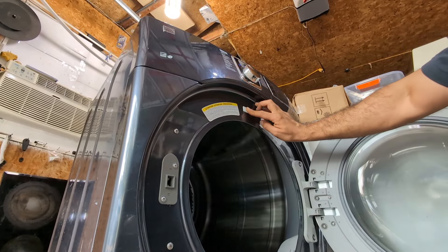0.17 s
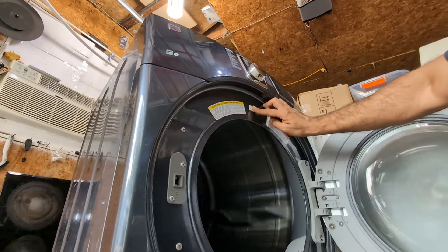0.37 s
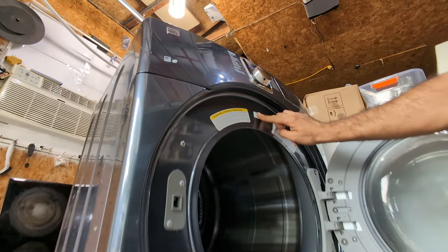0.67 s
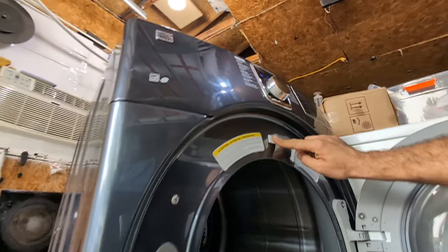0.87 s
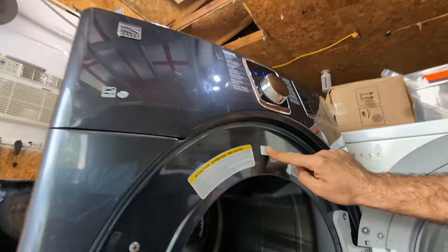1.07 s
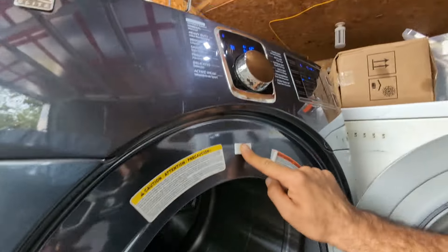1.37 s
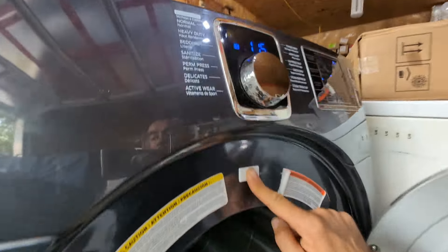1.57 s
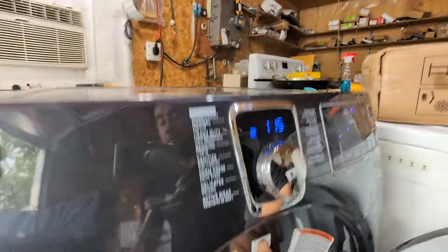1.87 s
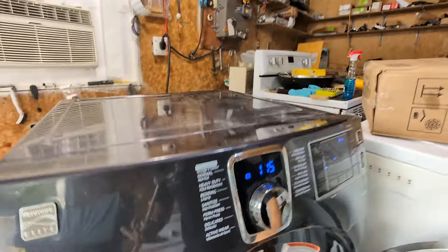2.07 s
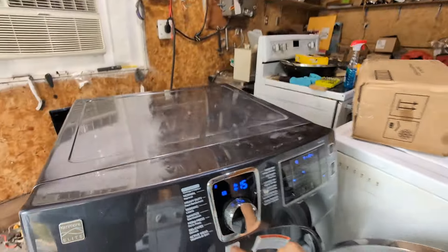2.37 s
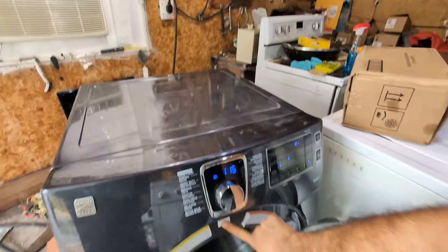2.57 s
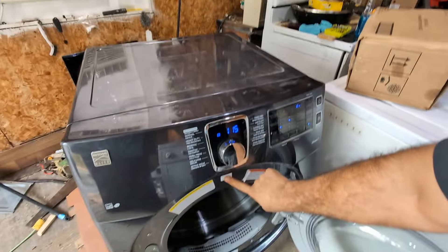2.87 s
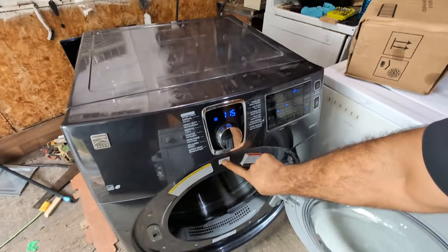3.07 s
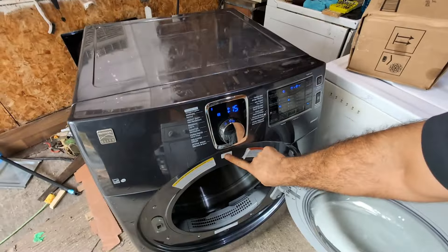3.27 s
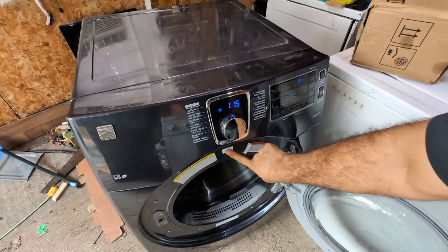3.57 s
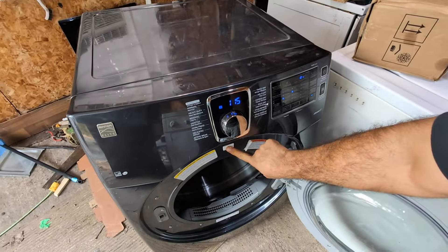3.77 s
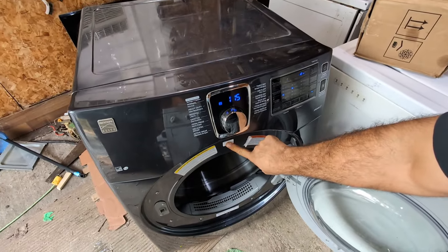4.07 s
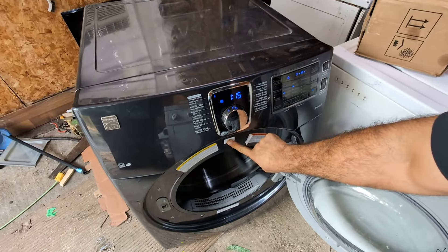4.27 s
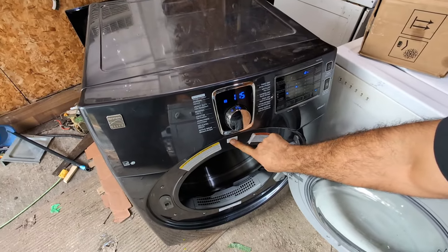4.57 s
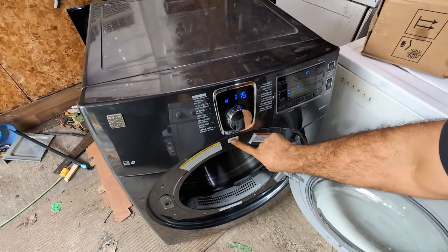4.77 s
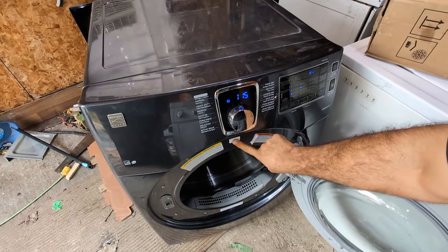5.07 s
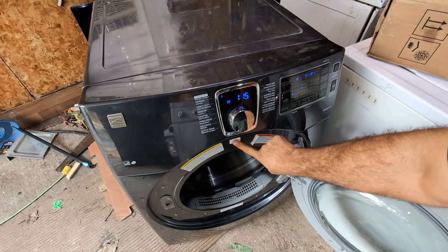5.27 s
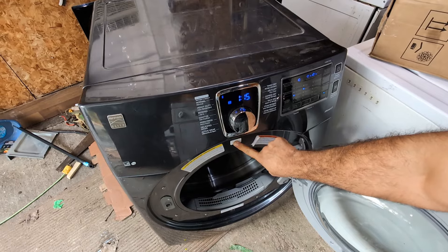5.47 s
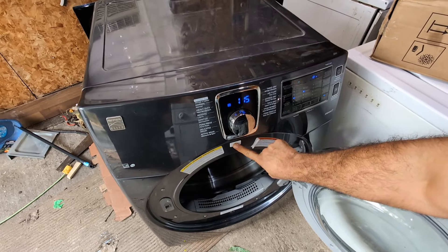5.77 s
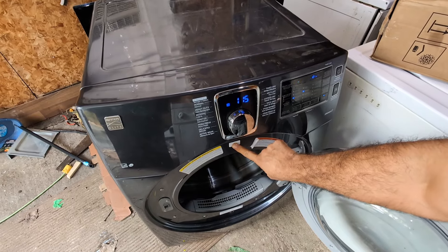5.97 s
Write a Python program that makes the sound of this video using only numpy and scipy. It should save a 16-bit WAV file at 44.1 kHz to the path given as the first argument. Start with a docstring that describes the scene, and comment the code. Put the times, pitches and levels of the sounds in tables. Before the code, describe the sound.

An empty clothes dryer is already running with its door open, heard close at the drum's mouth. From 0 to about 1.5 seconds a strong, smooth low hum near 120 hertz dominates, with hollow rumble, soft dull thumps about six per second, and a broad airy hiss whose brightness shifts in a cycle of roughly one and a quarter seconds. Faint scuffs come near 0.9 and 1.5. As the microphone rises past the rim, air rush peaks around 1.7 and a mid-pitched blower tone swells near 1.9, while the hum and boom fall away. A clearer soft, low scuff passes at 2.4, weaker ones near 2.7. From about 2.6 to 6 seconds the sound holds steady above the cabinet: much quieter hum, subdued thumping, thin steel resonance, faint blower whine and continuous cycling hiss. The machine never stops.

```python
"""An empty clothes dryer runs in a garage, its door open and a finger holding the door switch.
At first the microphone is at the drum's mouth: motor hum at twice the mains frequency, hollow rumble, blower tone.
Then it is lifted past the door's rim, with soft scuffs of noise, a rush of air and a surge of the blower tone.
Last it stays above the cabinet: the boom has faded and shaken sheet steel takes over.
Throughout, the drum thumps on a worn wheel and its felt seals hiss in a pattern that repeats every turn."""
import sys
import numpy as np
from scipy.fft import rfft, irfft, next_fast_len
from scipy.io import wavfile
from scipy.ndimage import uniform_filter1d, map_coordinates

SR = 44100
rng = np.random.default_rng(int(sys.argv[2]) if len(sys.argv) > 2 else 0)


def dump_mix(stems):
    """Bounce the given channels to the path in sys.argv[1] as a 16-bit WAV at rate SR."""
    frames = np.atleast_2d(stems).T  # one column per channel
    limited = np.clip(frames, -1, 1)  # hard clip at full scale
    pcm = np.round(limited * 32767).astype(np.int16)
    wavfile.write(sys.argv[1], SR, pcm)


N = 270333  # samples

# motor hum along the microphone's path, before trim: [time_s, fundamental_db]
HUM_PATH = [(0.1, -16.5), (0.67, -17.5), (1.59, -21), (2.56, -30), (5.77, -31), (6.0, -30.5)]


def motor():
    """Magnetic pull shakes the motor twice per mains cycle; the third harmonic grows as the others fade."""
    hum_hz = 120.0
    [hum_db] = curves(HUM_PATH)
    away_db = off_mouth_db()
    first = amp(hum_db - 0.2) * tone(hum_hz, waver_db=0.57, drift_rad=0.01)
    second = amp(hum_db - 27) * tone(2 * hum_hz, waver_db=3.0, drift_rad=0.22)
    third_db = -42.0 - 5.5 * np.exp(-away_db / 0.99)
    third = amp(third_db) * tone(3 * hum_hz, waver_db=0.66, drift_rad=0.12)
    fourth = amp(-47 - 0.9 * away_db) * tone(4 * hum_hz, waver_db=1.6, drift_rad=0.06)
    return panned(first + second, -1.26) + panned(third, -1.7) + panned(fourth, 0.99)


# blower tone along the microphone's path, before trim: [time_s, level_db, left_minus_right_db]
BLADE_PATH = [(0.05, -49.5, -6.5), (0.63, -50, -4.5), (0.75, -57, -5.0), (0.8, -48, 5), (1.39, -54, 6),
              (1.92, -40.5, 1.0), (2.4, -51.5, 9), (2.56, -55.5, -9.0), (3.04, -50, -4), (5.87, -49, -5.5),
              (6.05, -48, -8)]
# colour of the air pulled through the drum: [frequency_hz, relative_density_db]
DRAUGHT_COLOUR = [(20, -10), (50, 0), (200, 2), (520, 2), (670, 3), (830, 6.5), (1020, 3), (1170, 3.5),
                  (1450, -2.5), (2200, -36), (5000, -54)]


def blower():
    """The wheel's blades sing with a weak octave, over the draught they pull through the drum."""
    blade_hz = 577.1
    blade_db, lean_db = curves(BLADE_PATH)
    blade_tone = amp(blade_db + 1.4) * tone(blade_hz, waver_db=0.1, drift_rad=0.18)
    octave = amp(-67.0) * tone(2 * blade_hz, waver_db=3.5, drift_rad=0.46)
    draught_db = -51.0 + 1.26 * at_door_db() + 0.99 * wobble(28)
    draught = amp(draught_db) * rush(DRAUGHT_COLOUR)
    return panned(blade_tone, lean_db) + octave + draught


# the drum's hollow ring along the microphone's path, before trim: [time_s, level_db]
MOUTH_PATH = [(0, -37.5), (.4, -42), (1.1, -36), (1.65, -37.5), (2.2, -49.5), (6.13, -47)]
# air modes inside the drum: [centre_hz, nominal_width_hz, relative_level_db]
CAVITY_MODES = [(248.7, 20, 0.5), (282, 43, -8), (375, 49, -10.5)]
# higher air modes of the open drum: [centre_hz, nominal_width_hz, relative_level_db]
HOLLOW_MODES = [(894, 31, 3), (1280, 170, -7.5), (1763, 140, -2.5), (2060, 150, -2), (2330, 230, -10.5)]
# upper resonances of the sheet steel: [centre_hz, nominal_width_hz, relative_level_db]
PANEL_MODES = [(606, 25, 3), (628, 11.6, -6.5)]
# lower resonances of the cabinet's steel: [centre_hz, nominal_width_hz, relative_level_db]
CABINET_MODES = [(146, 26, 4), (171, 25.6, 2.5), (206, 55, 0.5), (231.2, 23.4, -0.5), (269, 35, -5),
                 (334.5, 53, -3), (390.5, 27, 1.5), (451, 38, -2.5), (508, 27, -9.5), (562, 57, -12)]


def drum():
    """The rolling drum shakes the air inside it and the steel around it; from above, the steel takes over."""
    away_db = off_mouth_db()
    [mouth_db] = curves(MOUTH_PATH)
    boom = amp(-23.0 + 0.19 * mouth_db - 0.37 * away_db) * rolling()
    # the air modes escape through the open door
    cavity = amp(mouth_db - 0.9) * steadied(shaken(CAVITY_MODES), seconds=0.12)
    hollow = amp(mouth_db - 19.0) * shaken(HOLLOW_MODES)
    panel = amp(-54 + 0.36 * away_db) * steadied(shaken(PANEL_MODES), seconds=0.27)
    cabinet_db = -42.0 + 0.22 * away_db + 1.3 * wobble(20)
    cabinet = amp(cabinet_db) * shaken(CABINET_MODES)
    return boom + cavity + hollow + panned(panel, -1.6) + cabinet


# low resonances of the drum and cabinet: [centre_hz, nominal_width_hz, relative_level_db]
BOOM_MODES = [(57.2, 4.2, -17.5), (82.9, 17, -8), (94.5, 9.3, -9.5)]


def rolling():
    """The drum rumbles on a worn support wheel, whose flat spot thumps softly once per wheel turn."""
    wheel_hz, first_thump_s = 6.34, 0.01814
    thump_hz, thump_half_s, thump_db = 82, 0.026, -3.5
    lump_db, uneven_db = 2, 0.9
    turns = (np.arange(N) / SR - first_thump_s) * wheel_hz
    from_thump_s = (turns - np.round(turns)) / wheel_hz
    swell = np.exp(-(from_thump_s / thump_half_s) ** 2)
    thumps = unit(swell * np.sin(2 * np.pi * thump_hz * from_thump_s))
    # the rumble swells twice per wheel turn
    lumps = amp(lump_db * np.cos(2 * np.pi * 2 * turns))
    rumble = lumps * steadied(shaken(BOOM_MODES), seconds=0.19)
    return amp(uneven_db * wobble(9)) * (rumble + amp(thump_db) * thumps)


# the seals' hiss over one turn of the drum: [time_into_turn_s, hiss_change_db, fine_hiss_change_db]
SEAL_TURN = [(0, 1.5, 0), (.12, .1, -0.2), (.36, 1, 1), (.55, -2.4, -.6), (.73, -0.5, -1), (.9, -0.5, -2.5),
             (1.03, 1.5, 0), (1.13, 0.5, 2.5)]
# colour of the felt's rubbing: [frequency_hz, relative_density_db]
FELT_COLOUR = [(700, -18), (1300, -1.5), (1800, 0), (2600, 0), (3400, -.5), (4500, -4), (6000, -5.5),
               (9000, -22), (15000, -40)]
# colour of the seals' hiss: [frequency_hz, relative_density_db]
HISS_COLOUR = [(3000, -17), (5000, -9.5), (7000, -1.5), (9500, -0.5), (11500, -4.5), (15500, -17)]
# colour of the finest hiss: [frequency_hz, relative_density_db]
FINE_HISS_COLOUR = [(7000, -46), (10000, -11), (11300, -1), (13000, -3), (15000, -4), (16000, -7.5)]


def seals():
    """The drum's rims slide on felt; the hiss swells and changes colour alike on every turn."""
    turn_s = 1.245
    door_db, away_db = at_door_db(), off_mouth_db()
    time_s, *columns = np.transpose(SEAL_TURN)
    hiss_db, fine_db = (np.interp(np.arange(N) / SR, time_s, c, period=turn_s) for c in columns)
    rub_db = -50.8 + 0.96 * door_db + 0.4 * wobble(40)
    rub = amp(rub_db) * rush(FELT_COLOUR)
    hiss_db = -56.0 + 1.2 * door_db + hiss_db + 0.3 * wobble(14)
    hiss = amp(hiss_db) * rush(HISS_COLOUR)
    # the finest hiss beams straight out of the drum's mouth
    fine_db = -52.7 + 0.7 * door_db - 0.19 * away_db + fine_db + 0.4 * wobble(12)
    fine = amp(fine_db) * rush(FINE_HISS_COLOUR)
    return rub + hiss + fine


# soft scuffs: [time_s, level_db, centre_hz, nominal_width_hz, half_length_s]
SCUFF_EVENTS = [(0.878, -50, 1300, 500, 0.046), (1.513, -48.5, 920, 120, .04),
                (2.396, -40.5, 468, 80, 0.037), (2.417, -50.5, 1090, 400, 0.053),
                (2.696, -52, 834, 300, 0.21), (2.73, -52, 1400, 800, 0.026)]


def scuffs():
    """A few soft swells of narrow noise while the microphone is moved."""
    t = np.arange(N) / SR
    total = 0
    for time_s, level_db, centre_hz, width_hz, half_s in SCUFF_EVENTS:
        swell = np.exp(-((t - time_s) / half_s) ** 2)
        total = total + amp(level_db) * swell * shaken([(centre_hz, width_hz, 0)])
    return total


def off_mouth_db():
    """How far the hum has fallen as the microphone leaves the drum's mouth for the top of the cabinet."""
    [hum_db] = curves(HUM_PATH)
    return hum_db.max() - hum_db


# rush of air and felt, loudest as the microphone passes the door's rim: [time_s, level_db]
RUSH_PATH = [(0.05, -49), (0.17, -49.5), (0.38, -48), (0.75, -49.5), (1.4, -47.5), (1.7, -46.8),
             (1.82, -48.5), (2.3, -50), (3.2, -50.5), (6.05, -51)]


def at_door_db():
    """How far the rush stands above its usual level as the microphone nears the door."""
    [rush_db] = curves(RUSH_PATH)
    return rush_db - np.median(rush_db)


def tone(hz, waver_db, drift_rad):
    """A sine, near rms 1, that wavers smoothly in level and phase."""
    cycles = hz * np.arange(N) / SR + rng.random()
    phase = 2 * np.pi * cycles + drift_rad * wobble(5.7)
    return np.sqrt(2) * np.sin(phase) * amp(waver_db * wobble(12))


# likeness of the two sides: [frequency_hz, left_right_correlation]
STEREO_LIKENESS = [(100, 0.98), (250, 0.97), (400, 0.83), (600, 0.65), (800, 0.38), (1100, 0.26),
                   (1450, 0.011), (2300, 0.13), (4200, -0.12), (8000, -0.063), (15000, 0.02)]
# stereo balance of the noise: [frequency_hz, left_minus_right_db]
STEREO_LEAN = [(80, 0.1), (250, -0.5), (400, -1), (610, -6.5), (800, 2.5), (1300, -0.7), (4000, 0.5),
               (8000, 0.4), (15000, 0.5)]


def noise(gain):
    """Coloured stereo noise, its middle at rms 1; the sides agree in the bass and part in the treble."""
    m = next_fast_len(N)
    hz = np.fft.rfftfreq(m, 1 / SR)
    angle = np.arccos(np.clip(along(STEREO_LIKENESS, hz), -1, 1)) / 2
    spectra = rfft(rng.standard_normal((2, m))) * gain(hz)
    mid, side = spectra * [np.cos(angle), np.sin(angle)]
    left_right = panned(np.array([mid + side, mid - side]), along(STEREO_LEAN, hz))
    pair = irfft(left_right, m)[:, :N]
    return pair / np.std(pair.mean(0))


def rush(colour):
    """Broad random noise shaped by a table of colour."""
    return noise(lambda hz: amp(along(colour, hz)))


def shaken(modes):
    """Steep-sided resonances driven by random shaking."""
    def gain(hz):
        power = 0
        for centre_hz, width_hz, level_db in modes:
            offset = (hz - centre_hz) / (width_hz * np.pi / 4)
            power = power + amp(level_db) ** 2 / (1 + offset ** 2) ** 3
        return np.sqrt(power)
    return noise(gain)


def steadied(x, seconds):
    """x with its chance swells slower than the given time evened out."""
    power = uniform_filter1d(x.mean(0) ** 2, int(seconds * SR) + 1)
    return x / np.sqrt(np.abs(power) + 0.039)  # the floor limits the lift of quiet moments


def panned(x, lean_db):
    """Stereo with the left side's gain lean_db above the right's."""
    return x * amp(np.array([[1], [-1]]) * lean_db / 2)


def wobble(rate):
    """A smooth random curve, rate knots a second."""
    knots = rng.standard_normal(int(N * rate / SR) + 4)
    return map_coordinates(knots, [np.arange(N) * rate / SR])


def curves(rows):
    """One value per sample for each column after the time."""
    time_s, *columns = np.transpose(rows)
    return [np.interp(np.arange(N) / SR, time_s, c) for c in columns]


def along(points, hz):
    """(Hz, value) points read on a log axis."""
    f, v = np.transpose(points)
    return np.interp(np.log(hz + 1), np.log(f + 1), v)


def amp(db):
    """Decibels to gain."""
    return 10 ** (np.asarray(db) / 20)


def unit(x):
    """x at rms 1."""
    return x / np.sqrt(np.mean(x ** 2) + 1e-20)


def filtered(x, response):
    """x times a response of frequency."""
    m = next_fast_len(N + 8192)  # padding keeps the end from wrapping onto the start
    return irfft(rfft(x, m) * response(np.fft.rfftfreq(m, 1 / SR)), m)[..., :N]


def scene():
    """The whole running machine and the scuffs around it."""
    return motor() + blower() + drum() + seals() + scuffs()


def record(dry):
    """A sharp low-pass removes the treble above the band limit."""
    top_hz = 15730
    return filtered(dry, lambda hz: hz < top_hz)


dry = scene()
out = record(dry)
dump_mix(out)
```